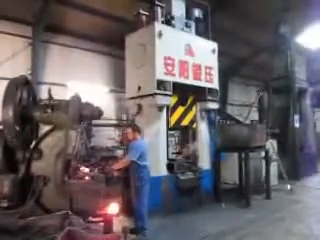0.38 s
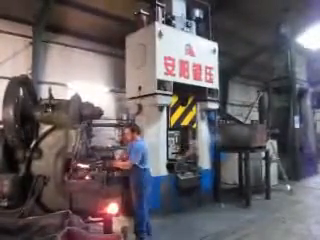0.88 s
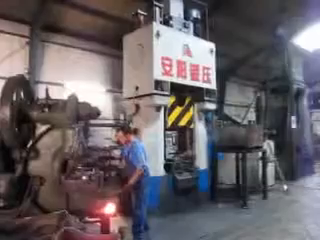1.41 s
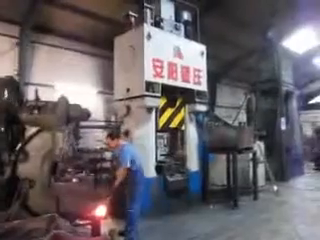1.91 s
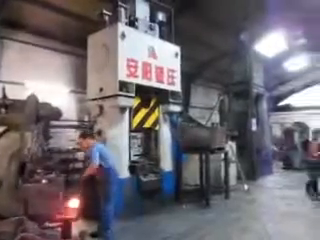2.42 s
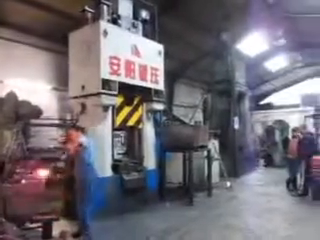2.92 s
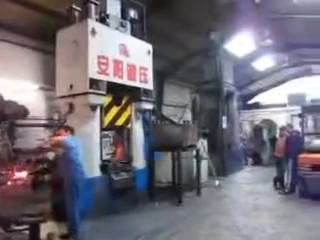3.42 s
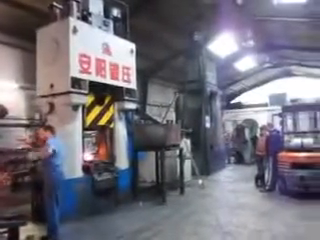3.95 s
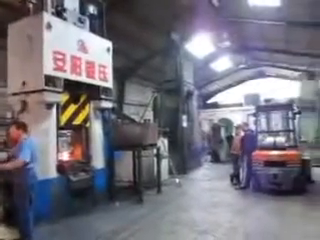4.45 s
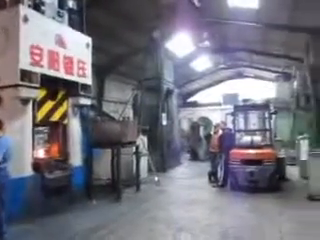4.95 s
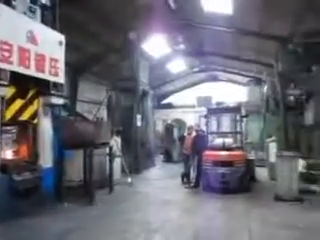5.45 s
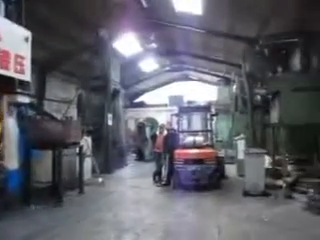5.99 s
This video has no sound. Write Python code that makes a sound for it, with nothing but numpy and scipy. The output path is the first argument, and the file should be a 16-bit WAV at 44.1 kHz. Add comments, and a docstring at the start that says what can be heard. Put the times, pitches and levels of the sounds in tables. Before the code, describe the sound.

A large, echoing forge hall is filled with the steady roar of furnace burners and blowers, heard through a small, dull microphone. A hydraulic pump holds a wavering mid-pitched whine over motor hum, faint gear noise and uneven low fan rumble. During the first 1.3 seconds, short puffs of air spit over a hissing leak that gradually fades, while the hollow booming swells, drops and returns fully around 1.25. At about 1.5 a steel piece clangs on the floor, bright and ringing; the drone dips for a moment, and weaker knocks follow near 1.8 before the ring is damped. From 2 to 5.9 the roar and held tone continue, with occasional soft puffs and faint distant steel tings near 4.8 and 5.8. Just before 6 a valve knocks open, and the pump labours in rough pulses with rushing oil as the hall begins to fade.

```python
"""In a large forge hall, furnace burners and blowers roar as coloured noise under booming resonances.
A seven-piston hydraulic pump whines near 334 Hz over motor hum and a low fan: wavering sines and narrow noise.
Air hisses in puffs of shaped noise; a steel piece clangs on the floor as decaying modes, and the level dips.
At the end a valve knocks open and the pump labours in rough pulses and rushing oil, while the hall fades.
Steel tings faintly from far down the hall. All is heard through a small, dull microphone."""
import sys
import numpy as np
from scipy import signal
from scipy.fft import rfft, irfft, next_fast_len
from scipy.io import wavfile
from scipy.ndimage import uniform_filter1d

SR = 44100
rng = np.random.default_rng(int(sys.argv[2]) if len(sys.argv) > 2 else 0)


def int16_out(signal):
    """Quantize to a 16-bit WAV file."""
    q = np.round(np.clip(np.atleast_2d(signal).T, -1, 1) * 32767)
    wavfile.write(sys.argv[1], SR, q.astype(np.int16))


def amplitude_ratio(level_db):
    """Convert a level in decibels to the matching linear amplitude (field) ratio."""
    exponent = np.asarray(level_db, float) / 20
    return 10 ** exponent


N = 269096
TIME = np.arange(N) / SR

# burner and blower roar, relative spectrum: pitch_hz, density_db (per Hz)
ROAR_SPECTRUM = [(30, -41), (42, -28), (60, -18.5), (75, -8.5), (120, -10.5), (180, -8), (270, -8.5),
                 (305, -9), (345, -7.5), (560, -8), (605, -10.5), (720, -10.5), (820, -14.5), (890, -13),
                 (940, -15.5), (1010, -13.5), (1200, -17.5), (1290, -20.5), (1470, -23), (2500, -27.5),
                 (4200, -33.5), (8000, -47.5)]
ROAR_DB = -20
TREBLE_FLICKER_DB = 0.53  # the roar from about 1 kHz up flickers as one
# hollow hall and duct resonances at full booming: pitch_hz, width_hz, level_db
BOOM_RESONANCES = [(141.5, 6, -37), (179.1, 27, -32), (243.6, 30, -37), (434.3, 71, -31.5),
                   (526.3, 38, -32.5)]
# level of the booming over time: time_s, share (1 = full booming, slightly more at its loudest)
BOOM_SHARE = [(0, 0.1), (.25, 0.6), (.45, 0.7), (.7, 0.1), (1, 0.1), (1.25, 1), (1.75, 1), (2, 1),
              (2.45, 0.82), (2.65, 0.93), (2.85, 1), (3.2, 1.08), (3.5, 0.97), (4.3, 1), (4.45, 0.8),
              (4.6, 0.98), (5.1, 0.98), (6.1, 0.65)]
BOOM_LOW_DB = -5.5  # gain of the booming at share 0

SHAFT_HZ, PISTONS = 47.72, 7
# piston tone, its level wavering, dropping at the first clang and at the valve: time_s, level_db
PISTON_LEVEL = [(0.0, -32), (0.27, -25), (0.54, -30.5), (0.73, -24.5), (0.8, -39), (0.83, -26),
                (1.02, -32.5), (1.05, -27), (1.41, -21.5), (1.44, -38), (1.49, -19), (1.61, -49),
                (1.68, -25), (1.85, -24.5), (1.88, -32), (1.93, -24), (2.23, -21), (2.26, -28), (2.33, -25),
                (2.38, -29), (2.63, -21), (2.89, -26), (2.92, -40), (2.99, -23), (3.36, -19.5), (3.58, -27),
                (3.65, -22), (3.91, -24), (4.33, -21.5), (4.48, -29), (4.52, -23), (5.98, -23.5),
                (6.01, -39), (6.1, -27)]
# its octave, with slower level changes of its own, fading at the end: time_s, level_db
OCTAVE_LEVEL = [(0, -29.5), (.5, -33.5), (.7, -34), (1.4, -37.5), (2, -33.5), (2.7, -35), (3.4, -36.5),
                (4.4, -32.5), (5, -38), (6.1, -52)]
# weaker shaft tones: pitch in multiples of the shaft rate, and level_db of each
SHAFT_MULTIPLES = (4, 5, 6, 8, 11, 13)
SHAFT_LEVELS = [-40, -39.5, -43.5, -39, -42, -39.5]
# motor hum: pitch_hz, and level_db of each
HUM_PITCHES = (47., 350., 700., 900., 1573., 3075., 3282.)
HUM_LEVELS = [-43.5, -39.5, -43, -43, -50.5, -64.5, -59.5]
# low fan rumble near 85 Hz, level fluctuating unevenly: time_s, level_db
FAN_LEVEL = [(0.0, -30), (0.1, -26), (0.39, -43), (0.44, -29.5), (0.59, -34.5), (0.87, -26), (0.97, -36),
             (1.21, -28), (1.24, -38), (1.51, -25.5), (1.54, -33), (2.0, -33), (2.51, -24), (2.62, -36),
             (2.74, -26.5), (3.21, -34), (3.26, -23), (3.36, -47), (3.41, -24.5), (3.64, -32.5),
             (3.96, -30), (4.13, -40), (4.18, -24.5), (4.6, -32), (4.64, -25.5), (4.96, -33), (4.99, -36),
             (5.84, -33), (5.93, -27.5), (6.1, -56.5)]

# steel piece, its modes relative to each other: pitch_hz, level_db, t60_s
STEEL_MODES = [(2832, 5, 2.7), (2856, -2, 1.5), (3074, -8, .6), (3941, 4.5, 2.1), (3905, -2, 1.5),
               (4307, -8, 1.2), (4963, -4, 1.2), (5416, -1, 1.5), (6067, -5, .8)]
# blows on the floor: start_s, level_db, ring_db (added to the ring alone)
CLANG_BLOWS = [(1.513, -34.5, -6.5), (1.769, -46.5, -11), (1.83, -50, -12.5)]
REST_S, REST_T60_S = 1.86, 0.45  # the piece comes to lie flat and the floor damps it
# the level dips at the first clang
DIP_FALL_S, DIP_HOLD_S, DIP_RECOVER_S, DIP_DB = 0.024, 0.083, 0.06, -7.5
DIP_LINGER, DIP_LINGER_S = 0.44, 0.17  # share of the dip that lingers, and its decay time

VALVE_S, LOADED_HZ = 5.972, 328
# knock of the opening valve: pitch_hz, width_hz, level_db
VALVE_BANDS = [(124, 30, -25), (222, 50, -21), (320, 80, -23), (596, 400, -21), (1590, 200, -30),
               (2000, 300, -29), (2500, 2500, -27), (3420, 150, -32)]
# partials of the labouring pump, multiples 1 to 10 of its pitch: level_db
LOADED_PARTIALS = [-33, -26, -31, -32, -37, -32, -35, -39, -41, -40]
PIPE_HZ, PIPE_DB = 1008, -28  # a pressure pipe rings hoarsely beside the third partial
HALL_DB_PER_S, BOOM_DB_PER_S = -19, -100  # after the valve: fade of the hall, extra fade of its booming

# air puffs: start_s, length_s, level_db
AIR_PUFFS = [(0.141, 0.08, -32.5), (0.342, 0.034, -33.5), (0.44, 0.045, -30), (0.527, 0.044, -29),
             (0.734, 0.097, -28.5), (0.891, 0.046, -30), (0.999, .025, -30.5), (1.081, 0.037, -31.5),
             (1.164, 0.034, -37), (1.271, 0.056, -37), (1.683, 0.1, -37), (1.963, 0.1, -34),
             (2.695, 0.14, -38.5), (2.972, 0.072, -37), (3.74, 0.067, -37.5), (4.434, 0.11, -39),
             (4.822, 0.084, -37), (5.251, .04, -44), (5.568, 0.78, -41)]
PUFF_SWELL_S, PUFF_FADE_S = 0.07, 0.016
# relative spectrum of the puffs: pitch_hz, density_db (per Hz)
PUFF_SPECTRUM = [(400, -33.5), (900, -6), (1300, -8), (2000, -7.5), (3400, -9), (5000, -13.5), (6300, -18),
                 (8000, -21)]
# relative spectrum of the fading air leak: pitch_hz, density_db (per Hz)
LEAK_SPECTRUM = [(400, -22), (800, -9.5), (1120, 4.5), (1400, -5), (2200, -6.5), (3400, -13), (5000, -19.5),
                 (8000, -25.5)]
LEAK_DB, LEAK_DB_PER_S, LEAK_FAINT_DB = -26, -6, -45  # level at the start, fade, faint level it ends on

# gear tones at 15 to 32 times the shaft rate: level_db
GEAR_LEVELS = [-43.5, -49.5, -48, -52, -54, -57, -47.5, -49.5, -56, -46, -53, -52.5, -57.5, -54.5, -55,
               -60.5, -54, -55.5]
# faint far steel tings: start_s, pitch_hz, level_db, t60_s
FAR_TINGS = [(4.83, 6080, -47, .6), (5.775, 6100, -45, 0.6)]
# treble loss of the microphone: pitch_hz, gain_db
MIC_RESPONSE = [(4000, 0), (5500, -1), (6200, -4.5), (6700, -10.5), (7000, -15), (7300, -43), (7600, -69)]


def curve(table, column=1):
    """One column of a table along time."""
    rows = np.array(table, float)
    return np.interp(TIME, rows[:, 0], rows[:, column])


def unit(x):
    """Scale to rms 1."""
    return x / np.sqrt(np.mean(x ** 2))


def walk(rate):
    """Random levels held 1 / rate s and slewed twice; spread near 1."""
    steps = np.repeat(rng.standard_normal(int(TIME[-1] * rate) + 2), 16)
    slewed = uniform_filter1d(uniform_filter1d(steps, size=16), size=16)
    return 1.3 * np.interp(TIME * rate * 16, np.arange(len(slewed)), slewed)


def coloured(points, flicker_db, treble_db=0):
    """Noise with a given spectrum, in octave bands that flicker apart; the treble also flickers together."""
    hz, db = np.transpose(points)
    size = next_fast_len(N)
    octave = np.log2(np.maximum(np.fft.rfftfreq(size, 1 / SR), 1))
    spectrum = rfft(rng.standard_normal(size)) * amplitude_ratio(np.interp(octave, np.log2(hz), db))
    together = treble_db * walk(24)
    out = 0
    for centre in range(4, 15):  # 16 Hz to 16 kHz
        overlap = np.clip(1 - abs(octave - centre), 0, 1)
        part = irfft(spectrum * overlap, size)[:N]
        apart = flicker_db * (walk(5.5) + 0.95 * walk(1.0))
        out = out + part * amplitude_ratio(apart + (centre >= 10) * together)
    return unit(out)


def resonance(x, hz, width):
    """Two-pole band-pass."""
    return signal.lfilter(*signal.iirpeak(hz, hz / width, SR), x)


def band(hz, width):
    """Noise through a steep resonance, rms 1."""
    return unit(resonance(resonance(rng.standard_normal(N), hz, width), hz, width))


def tone(hz, waver_db, drift):
    """Sine of rms near 1; hall echoes make its level and phase (drift, radians) waver."""
    phase = 2 * np.pi * (hz * TIME + rng.random()) + drift * walk(5)
    return np.sqrt(2) * amplitude_ratio(waver_db * walk(9)) * np.sin(phase)


def since_valve():
    """Seconds since the valve opened, 0 before."""
    return np.maximum(TIME - VALVE_S, 0)


def roar():
    """Broad flame and fan noise with the booming resonances on top."""
    broad = amplitude_ratio(ROAR_DB) * coloured(ROAR_SPECTRUM, flicker_db=0.5, treble_db=TREBLE_FLICKER_DB)
    booms = sum(amplitude_ratio(db) * band(hz, width) for hz, width, db in BOOM_RESONANCES)
    return broad + booming() * booms


def booming():
    """Gain of the low resonances: it rises and falls over time and fades after the valve."""
    return amplitude_ratio(BOOM_LOW_DB * (1 - curve(BOOM_SHARE)) + BOOM_DB_PER_S * since_valve())


def piston():
    """The held piston tone, a sine with narrow noise around it; its level changes are rounded off."""
    hz = PISTONS * SHAFT_HZ
    level = np.sqrt(uniform_filter1d(amplitude_ratio(curve(PISTON_LEVEL)) ** 2, size=1500))
    return level * (tone(hz, waver_db=0.94, drift=0.66) + amplitude_ratio(-9) * band(hz, 14))


def pump():
    """Piston octave, weaker shaft tones and motor hum, all wavering sines."""
    octave = amplitude_ratio(curve(OCTAVE_LEVEL)) * tone(2 * PISTONS * SHAFT_HZ, waver_db=3.0, drift=0.5)
    shaft = sum(amplitude_ratio(db) * tone(k * SHAFT_HZ, waver_db=3.5, drift=0.65)
                for k, db in zip(SHAFT_MULTIPLES, SHAFT_LEVELS))
    hum = sum(amplitude_ratio(db) * tone(hz, waver_db=1.7, drift=0.59) for hz, db in zip(HUM_PITCHES, HUM_LEVELS))
    return octave + shaft + hum


def fan():
    """Low fan rumble: a blade tone wandering by a few hertz, and narrow duct noise around it."""
    turns = np.cumsum(84.5 + 3.45 * walk(5)) / SR
    blades = amplitude_ratio(-1.0 + 1.6 * walk(8.1)) * np.sqrt(2) * np.sin(2 * np.pi * turns)
    duct = amplitude_ratio(-6) * band(87, 14)
    return amplitude_ratio(curve(FAN_LEVEL)) * (blades + duct)


def clangs():
    """Each blow cracks and rings the steel; a bright splash of noise dies off in the hall."""
    out = np.zeros(N)
    splash = band(3300, 5000)
    # hall echoes make every mode flutter on its own
    rings = [np.sin(2 * np.pi * hz * TIME + 0.8 * walk(45)) * amplitude_ratio(3 * walk(35) - 1)
             for hz, _, _ in STEEL_MODES]
    damped = amplitude_ratio(-60 * np.maximum(TIME - REST_S, 0) / REST_T60_S)
    for start, db, ring_db in CLANG_BLOWS:
        age = np.maximum(TIME - start, 0)
        modes = sum(amplitude_ratio(d - 60 * age / t60) * r for (_, d, t60), r in zip(STEEL_MODES, rings))
        build_up = 1 - np.exp(-(age / 0.055) ** 2)  # as the echoes arrive
        ring = damped * amplitude_ratio(ring_db) * build_up * modes
        crack = amplitude_ratio(3.5 - 60 * age / 0.11)
        tail = amplitude_ratio(2.0 - 60 * age / 1.4)
        onset = 1 - np.exp(-age / 0.0034)
        out += amplitude_ratio(db) * (ring + onset * (crack + tail) * splash)
    return out


def dip():
    """0 to 1 and back: quick fall at the first clang, a hold, a brisk recovery with a lingering rest."""
    age = TIME - CLANG_BLOWS[0][0]
    after = np.maximum(age - DIP_FALL_S - DIP_HOLD_S, 0)
    brisk = (1 - DIP_LINGER) * np.clip(1 - after / DIP_RECOVER_S, 0, 1)
    lingering = DIP_LINGER * np.exp(-after / DIP_LINGER_S)
    return np.clip(age / DIP_FALL_S, 0, 1) * (brisk + lingering)


def valve_knock():
    """The opening valve: resonant noise bands with a sharp onset and a short decay."""
    age = since_valve()
    clack = sum(amplitude_ratio(db) * band(hz, width) for hz, width, db in VALVE_BANDS)
    return amplitude_ratio(-60 * age / 0.22) * (1 - np.exp(-age / 0.001)) * clack


def loaded_pump():
    """Rough pressure pulses as unsteady harmonics, a hoarse pipe and the noise of rushing oil."""
    age = since_valve()
    phase = 2 * np.pi * LOADED_HZ * TIME + 0.15 * walk(70)
    pulses = 0
    for k, db in enumerate(LOADED_PARTIALS, start=1):
        rough_phase = k * phase + 1.2 * walk(80) + 2 * np.pi * rng.random()
        pulses = pulses + np.sqrt(2) * amplitude_ratio(db + 3.5 * walk(60)) * np.sin(rough_phase)
    pipe = amplitude_ratio(PIPE_DB) * band(PIPE_HZ, 70)
    oil = amplitude_ratio(-30) * band(1700, 3200)
    return (1 - np.exp(-(age / 0.04) ** 2)) * (pulses + pipe) + (1 - np.exp(-age / 0.018)) * oil


def hiss():
    """Air as noise: a dull, flickering leak that fades to a faint level, and brighter swelling puffs."""
    leak_level = amplitude_ratio(np.maximum(LEAK_DB + LEAK_DB_PER_S * TIME, LEAK_FAINT_DB))
    leak = leak_level * coloured(LEAK_SPECTRUM, flicker_db=3.1)
    power = 0
    for start, length, db in AIR_PUFFS:
        before = np.maximum(start - TIME, 0) / PUFF_SWELL_S
        after = np.maximum(TIME - start - length, 0) / PUFF_FADE_S
        power = power + amplitude_ratio(db) ** 2 * np.exp(-2 * (before + after))
    puffs = np.sqrt(power) * coloured(PUFF_SPECTRUM, flicker_db=0.0)
    return amplitude_ratio(0.6 * walk(33)) * (leak + puffs)


def clatter():
    """Bearing and gear noise repeats on every shaft turn: a comb of faint, uneven tones."""
    return sum(amplitude_ratio(db) * tone(k * SHAFT_HZ, waver_db=3.0, drift=0.55)
               for k, db in zip(range(15, 33), GEAR_LEVELS))


def tings():
    """Thin, rough, high rings from far down the hall: narrow noise dying away."""
    out = 0
    for start, hz, db, t60 in FAR_TINGS:
        age = np.maximum(TIME - start, 0)
        out = out + amplitude_ratio(db - 60 * age / t60) * (1 - np.exp(-age / 0.004)) * band(hz, 300)
    return out


def scene():
    """The hall's drone dips under the clang; the labouring pump rises over it."""
    hall = roar() + pump() + clatter() + hiss() + tings()
    hall_gain = amplitude_ratio(DIP_DB * dip() + HALL_DB_PER_S * since_valve())
    mix = hall_gain * hall + piston() + fan() + clangs() + valve_knock() + loaded_pump()
    return mix[None]  # one channel


def band_limit(x):
    """A steep low-pass at the top of the band."""
    return signal.sosfilt(signal.butter(12, 7270, fs=SR, output="sos"), x)


def record(dry):
    """The microphone rounds peaks and loses the deep bass and the treble."""
    rounded = np.tanh(1.625 * dry) / 1.622
    bass_cut = signal.butter(3, 42, "high", fs=SR, output="sos")
    x = signal.sosfilt(bass_cut, rounded)
    hz, db = np.transpose(MIC_RESPONSE)
    size = next_fast_len(N)
    response = amplitude_ratio(np.interp(np.fft.rfftfreq(size, 1 / SR), hz, db))
    mix = irfft(rfft(x, size) * response, size)[:, :N]
    return band_limit(mix)


dry = scene()
out = record(dry)
int16_out(out)
```